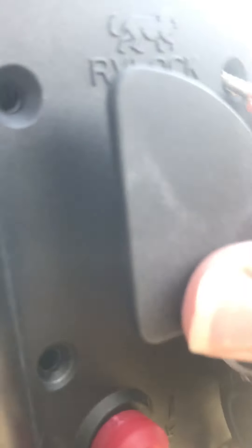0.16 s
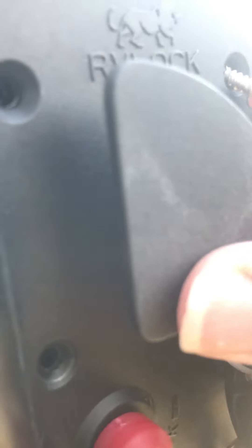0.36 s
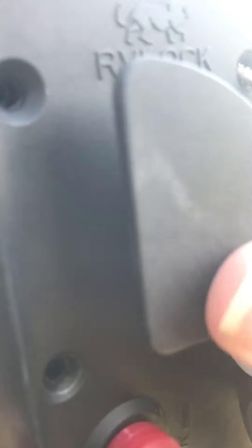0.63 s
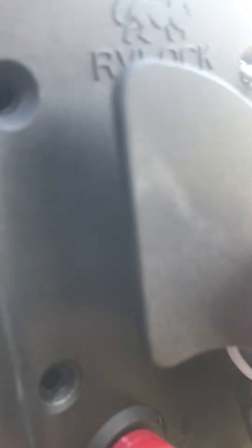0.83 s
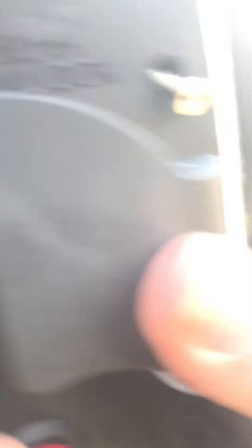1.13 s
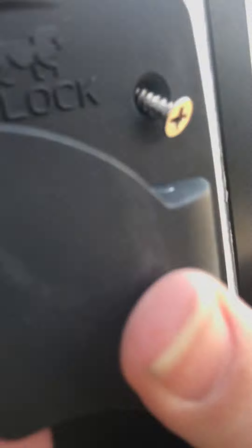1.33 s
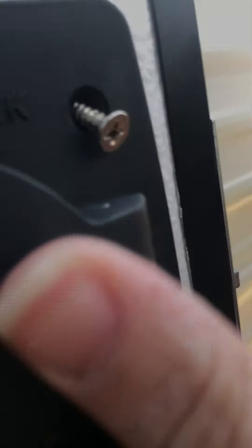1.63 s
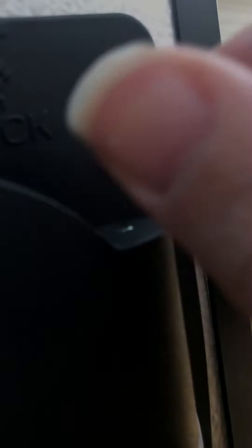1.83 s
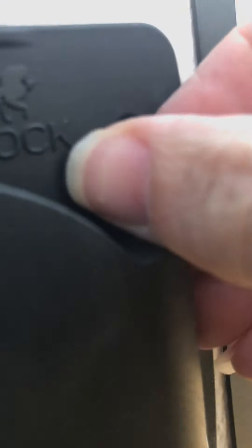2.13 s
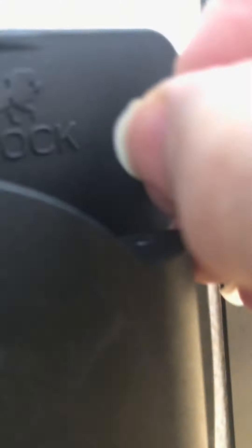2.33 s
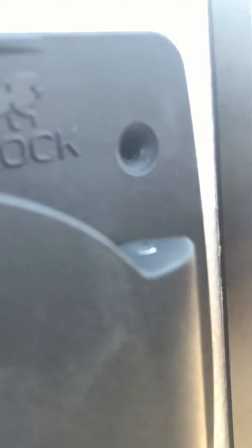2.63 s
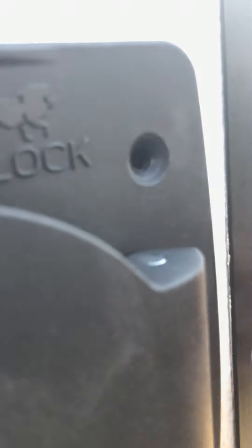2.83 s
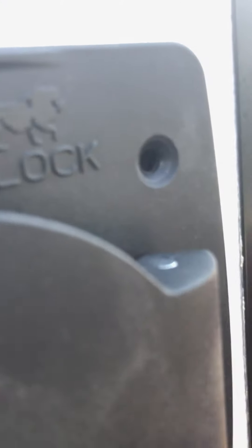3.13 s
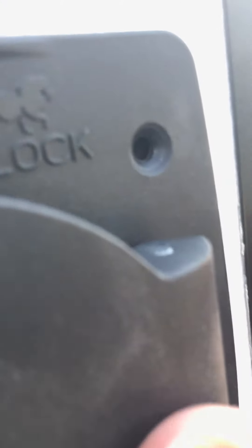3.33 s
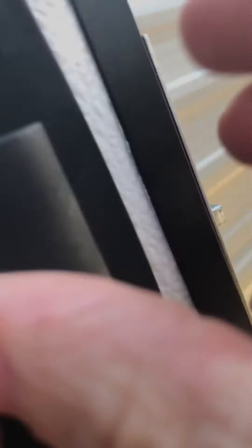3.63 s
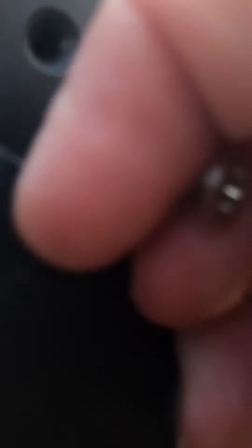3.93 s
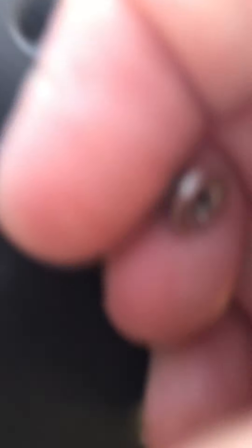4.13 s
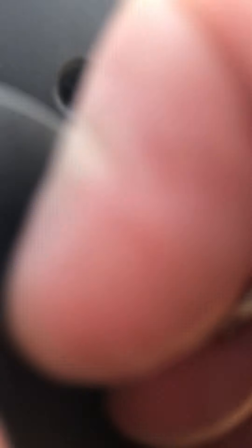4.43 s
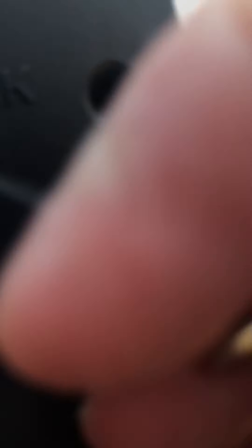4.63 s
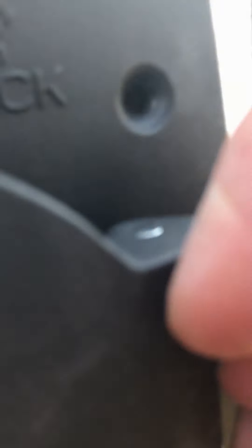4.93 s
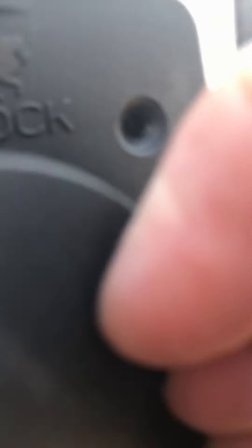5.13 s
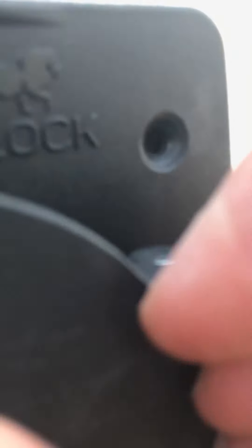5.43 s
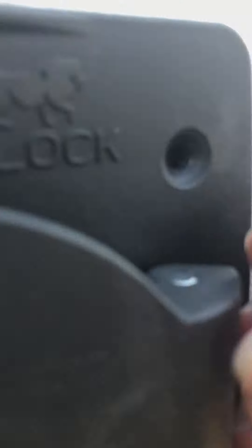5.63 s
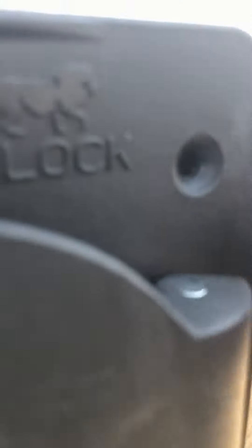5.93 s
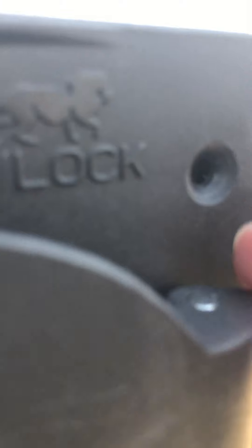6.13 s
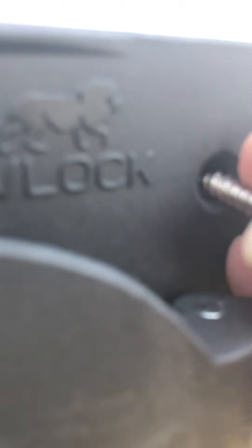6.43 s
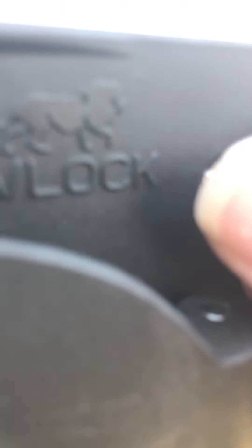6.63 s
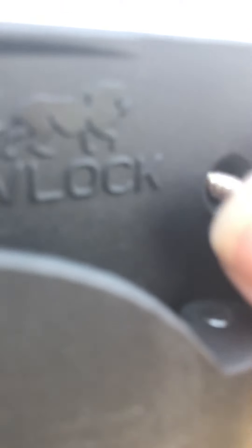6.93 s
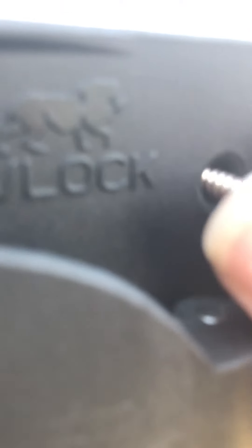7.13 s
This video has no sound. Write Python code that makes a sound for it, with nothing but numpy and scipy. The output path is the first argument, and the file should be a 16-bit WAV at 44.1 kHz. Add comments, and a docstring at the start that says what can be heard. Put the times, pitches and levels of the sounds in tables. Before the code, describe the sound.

A phone close to a hollow door lock in a still, quiet room with faint low air and hand rumble. From 0 to 1 s, faint spring ticks, light clicks at 0.2 and 0.4, a small double tap near 0.8, and dry thumb rustle. Soft brushing and tiny taps continue to 2.2, when a crisp metallic snap with a tiny squeal and several clicks breaks out until 2.35, followed by a faint finger squeak. Sparse soft taps follow around 3.1 to 3.4. Finger scuffs swell from 3.7; from 3.95 the loose latch rattles and clicks. From 4.4 to 5.7 comes the busiest, loudest stretch: hard plastic clacks, short metal scrapes, and dull door thumps, strongest near 4.65 and 5.35, with small bright key clinks around 4.9 to 5.6. Then near silence; at 6.3 to 6.6 gritty screw scraping and light clacks, and one last faint slide at 7.2.

```python
"""Hands on a door lock

Handle and latch clack in their housing, parts slide and squeal, a screw grates in its hole, a key clinks.
Contacts are noise bursts through the housing modes; they echo in the hollow door and stir its panel.
Fingers stroke the casing as coloured stick-slip noise, the loose latch rattles, harder blows shake the door.
Close by a phone, which rounds peaks and cuts the top; a quiet room lies behind."""
import sys
import numpy as np
from scipy import signal
from scipy.fft import rfft, irfft, next_fast_len
from scipy.io import wavfile
from scipy.ndimage import uniform_filter1d, map_coordinates

SR = 44100
rng = np.random.default_rng(int(sys.argv[2]) if len(sys.argv) > 2 else 0)


def waveform_to_disk(signal):
    """Save audio, clipped to [-1, 1], as 16-bit WAV at the path in sys.argv[1]."""
    frames = np.transpose(np.atleast_2d(signal))
    scaled = np.clip(frames, -1, 1) * 32767
    samples = np.round(scaled).astype(np.int16)
    wavfile.write(sys.argv[1], SR, samples)


N = 320607

# sharp contacts of the lock parts: start_s, knock_pitch_hz, knock_db, clack_db, tick_db
CONTACTS = [(0.2059, 1640, -41, -43, -35), (0.2104, 1150, -31, -40, -38), (0.245, 1250, -42, -44.5, -51),
            (.3795, 1600, -43.5, -48, -53), (0.4094, 1270, -47, -41, -44), (0.4335, 1690, -29, -28.5, -48),
            (0.7903, 954, -33, -37.5, -57), (.8007, 970, -32, -32.5, -62), (0.814, 1600, -42, -40, -61),
            (1.06, 1380, -40.5, -43, -52), (1.555, 1200, -51, -56, -58), (1.62, 1570, -38, -51, -63),
            (1.658, 1410, -43.5, -51, -72), (1.9007, 1176, -44, -52, -54), (2.047, 1070, -45, -50.5, -53.5),
            (2.208, 1350, -41, -50, -59), (2.2844, 1190, -29, -30, -34), (2.2931, 976, -34.5, -27.5, -20.5),
            (2.297, 1000, -35.5, -34, -29), (2.3181, 1340, -45.5, -28.5, -29.5),
            (2.331, 1462, -32, -33.5, -52), (2.335, 1400, -28.5, -39, -59),
            (2.3488, 1510, -29.5, -34.5, -52), (3.135, 1230, -43.5, -41, -50.5),
            (3.1652, 1150, -32, -66, -65), (3.2115, 1190, -40, -48, -69.5), (3.3728, 1410, -41, -53, -52),
            (3.9638, 1310, -39, -30, -50), (3.9842, 1590, -32.5, -48, -60), (4.0875, 1750, -22, -29.5, -51),
            (4.2577, 720, -30, -35, -46), (4.309, 1710, -33.5, -40, -45), (4.418, 1304, -31, -44.5, -44.5),
            (4.4474, 1780, -17.5, -26.5, -45), (4.462, 1510, -25.5, -32, -48),
            (4.483, 1700, -35, -44, -65.5), (4.5129, 850, -29, -61, -64), (4.5938, 1204, -27, -47, -67.5),
            (4.633, 1190, -25, -40.5, -42), (4.6438, 1170, -11, -15.5, -42), (4.692, 1300, -21.5, -31, -59),
            (4.7043, 1020, -26, -34.5, -56.5), (4.717, 1100, -23.5, -35.5, -57),
            (4.7249, 980, -32.5, -32, -56), (4.742, 870, -28.5, -33.5, -71),
            (4.8077, 1540, -30.5, -34, -48.5), (4.8713, 970, -16.5, -17.5, -43),
            (4.88, 840, -23, -38.5, -35.5), (4.9295, 1600, -22, -25, -39), (5.016, 1070, -20.5, -41, -49),
            (5.021, 930, -18.5, -23.5, -44), (5.0366, 1100, -28, -38, -57), (5.062, 1550, -31, -38.5, -65),
            (5.074, 1500, -33.5, -47.5, -68), (5.169, 1200, -33.5, -43, -49),
            (5.181, 1280, -27, -38.5, -46), (5.1871, 1230, -15.5, -40, -43.5),
            (5.215, 1570, -17.5, -31.5, -43.5), (5.2324, 1470, -20.5, -31, -49),
            (5.2406, 1372, -31.5, -34.5, -49), (5.3033, 1140, -20, -38.5, -47),
            (5.316, 1300, -24, -42, -55.5), (5.3441, 900, -11, -19, -47),
            (5.3687, 1070, -5.5, -27.5, -35.5), (5.43, 896, -22, -37.5, -61), (5.4492, 1070, -30, -24, -38),
            (5.471, 1120, -19, -22.5, -38), (5.4753, 1140, -34, -12.5, -25), (5.495, 1100, -32, -46, -55.5),
            (5.5854, 1410, -25.5, -29, -36), (5.6214, 1790, -18.5, -25, -34),
            (5.666, 1660, -27.5, -34.5, -52), (5.68, 1700, -34, -43, -62), (5.812, 1390, -41, -55, -88),
            (6.292, 1070, -48, -33.5, -47.5), (6.378, 900, -46, -42, -73), (6.4741, 1030, -38, -29.5, -52),
            (6.499, 780, -29, -26.5, -47), (6.506, 760, -36, -31.5, -55), (6.5251, 720, -32, -39, -45.5),
            (6.5579, 970, -38.5, -36, -56)]
# metal sliding on metal: start_s, length_s, knock_pitch_hz, knock_db, clack_db, tick_db
METAL_SLIDES = [(1.614, 0.031, 790, -50, -69, -50), (2.257, 0.013, 1250, -49, -57, -48),
                (2.2768, 0.0025, 1700, -18, -15, -12), (2.2795, 0.0031, 1696, -26.5, -17.5, -10),
                (2.309, 0.01, 1330, -42, -34, -34.5), (3.513, 0.055, 1360, -50, -50, -57),
                (3.938, 0.019, 1330, -34, -32, -50), (4.029, 0.011, 1460, -27.5, -27.5, -27.5),
                (4.098, 0.047, 1420, -28.5, -41, -64), (4.227, 0.021, 1200, -38.5, -35.5, -40.5),
                (4.618, 0.0022, 1210, -24, -43.5, -35), (4.653, 0.01, 1100, -12.5, -18.5, -15.5),
                (4.965, 0.0059, 1470, -23.5, -32.5, -44), (5.125, 0.0058, 1230, -25, -33.5, -37.5),
                (5.3258, 0.0086, 1211, -32, -45, -27.5), (5.3671, 0.0091, 1110, -17, -16, -14.5),
                (5.44, 0.0055, 1000, -27.5, -28, -42), (6.289, 0.0085, 860, -39.5, -38, -59),
                (7.224, 0.043, 1410, -49.5, -49.5, -50.5)]
# squeals of the sliding parts: start_s, length_s, pitch_hz, level_db
SLIDE_SQUEALS = [(2.2754, 0.006, 5540, -14.5), (4.036, 0.0026, 8450, -19.5), (4.395, .011, 6260, -42.5),
                 (4.617, 0.0044, 6570, -28), (4.656, 0.0074, 4054, -16), (4.657, 0.0065, 14500, -14.5),
                 (5.372, 0.0067, 14700, -22)]
# screw pushed against its hole: start_s, length_s, level_db
SCREW_PUSHES = [(6.298, 0.013, -34.5), (6.335, 0.028, -43.5), (6.414, 0.067, -43.5)]
# screw thread colour: frequency_hz, level_db
THREAD_COLOUR = [(400, -7), (750, 4.5), (1750, -12), (3000, 1), (5500, -10), (6500, -25), (15000, -28)]
# span in which the latch hangs loose: start_s, end_s
LATCH_LOOSE_S = 3.93, 5.7
# finger strokes over the casing: start_s, length_s, friction_db (before the trim in fingers), hiss_db
FINGER_STROKES = [(0.197, 0.027, -41, -45), (0.379, 0.045, -42.5, -45.5), (0.703, 0.23, -57, -57),
                  (1.053, 0.04, -48, -55), (1.436, 0.13, -53, -64), (1.63, 0.083, -55, -66),
                  (1.89, 0.18, -52, -68), (2.215, 0.15, -41.5, -57), (3.098, 0.13, -51.5, -63.5),
                  (3.269, 0.21, -50, -66), (3.68, 0.25, -39.5, -52), (3.745, 0.052, -30.5, -41),
                  (3.812, 0.018, -31, -39), (3.936, 0.23, -36.5, -51), (4.215, 0.1, -40, -46.5),
                  (4.304, 0.18, -44, -63), (4.39, 0.023, -32, -45), (4.601, 0.11, -33, -45),
                  (4.84, 0.066, -35.5, -46.5), (4.948, 0.13, -34, -52.5), (5.109, 0.074, -39, -52),
                  (5.313, 0.06, -36.5, -39.5), (5.41, 0.28, -43, -57.5), (6.296, 0.45, -49, -67.5),
                  (7.229, 0.045, -44.5, -56)]
# finger friction colour: frequency_hz, level_db
RUB_COLOUR = [(300, -19.5), (520, 0.5), (760, 4), (1350, -1), (2000, -7.5), (2800, -8), (4100, -12),
              (4800, -27.5), (7000, -48)]
# finger hiss colour: frequency_hz, level_db
HISS_COLOUR = [(3000, -26.5), (4700, -2.5), (6200, 4.5), (7400, -3.5), (8600, -2), (11000, -7),
               (14500, -1.5), (16000, -12.5)]
# housing modes: frequency_hz, level_db, t60_s
HOUSING_MODES = [(890, -3, .04), (1095, -1, .045), (1330, -3, .05), (1515, -5, .04), (1665, -3, .05),
                 (2390, -1, .03), (2800, 1, .02), (4110, 1, .03), (5520, 2, .033), (6240, 1, .033)]
# door panel modes: frequency_hz, level_db, t60_s
PANEL_MODES = [(802, 0, .15), (1690, -13, .07), (3040, -7, .2)]
# pitches the casing weakens: frequency_hz, width_hz
CASING_NOTCHES = [(1970, 140), (4800, 270)]
# key against the plate: start_s, level_db
KEY_CLINKS = [(4.809, -48), (4.878, -31.5), (5.186, -36), (5.4763, -27), (5.504, -21.5), (5.587, -33)]
# key modes: frequency_hz, level_db, t60_s
KEY_MODES = [(6900, 5, 0.026), (7140, -2, 0.038), (9570, 4.5, 0.033), (10600, -14, 0.047),
             (14250, 4.5, 0.017), (15000, -4, .014)]
# loose spring set singing: start_s, level_db
SPRING_TWANGS = [(4.658, -63), (5.187, -63.5), (5.474, -58.5)]
# runs of handle spring ticks: start_s, length_s, level_db
SPRING_CREAKS = [(0.083, .056, -56.5), (0.185, .008, -42), (0.351, .008, -48), (0.47, .04, -56),
                 (0.997, .056, -53.5)]
# blows that reach door and hand: start_s, door_ring_db, rumble_db
DOOR_BLOWS = [(.213, -34, -37), (.765, -38.5, -38), (.796, -35, -53), (2.277, -25, -36.5),
              (3.168, -38, -40), (3.376, -39, -40), (3.728, -39, -44), (4.085, -36.5, -41),
              (4.122, -28.5, -36.5), (4.245, -38, -39), (4.349, -49.5, -33), (4.66, -15.5, -33),
              (5.037, -38.5, -37), (5.19, -33, -32), (5.376, -16.5, -30), (6.525, -43, -38)]
# door modes: frequency_hz, level_db, t60_s
DOOR_MODES = [(54.5, -12, .12), (146, -9.5, 0.21), (234, 1.5, .07), (278.3, 2, 0.1), (347, 3.5, 0.037),
              (409, -1, 0.088), (483, 1.5, .06), (664.5, 4.5, 0.052)]
# light thumb brushes over the plate: start_s, length_s, level_db
THUMB_BRUSHES = [(.04, 0.022, -51.5), (.712, 0.21, -53), (1.07, 0.033, -46), (1.105, 0.41, -56),
                 (1.44, 0.1, -51), (3.64, 0.054, -55)]
# thumb brush colour: frequency_hz, level_db
BRUSH_COLOUR = [(700, -17), (1200, 4.5), (1800, 5), (3600, -4), (4300, -1.5), (6600, -9), (7500, -14.5),
                (15000, -14)]
# holding hand rumble colour: frequency_hz, level_db
GRIP_COLOUR = [(22, -35), (35, -8.5), (50, 3), (120, -1.5), (190, -3), (280, -4.5), (400, -13.5),
               (500, -20.5), (800, -41.5)]
# still room colour: frequency_hz, level_db
AIR_COLOUR = [(18, -33), (30, -11.5), (86, -1), (210, -13), (287, -10), (404, -10), (473, -17), (1130, -20),
              (1960, -31.5), (5000, -40.5), (13000, -52), (16000, -49.5)]

ATTACK_S, SAG_DB_PER_S = 0.034, 13.5  # strokes
STROKE_RELEASE_T60_S, CREAK_GAP_S, CAVITY_T60_S = .13, .0165, .03
AIR_DB, TOP_HZ = -52, 15900


def undb(db):
    """Decibels to gain."""
    return 10 ** (np.asarray(db) / 20)


def unit(x):
    """Scale to rms 1."""
    return x / np.sqrt(np.mean(x ** 2) + 1e-20)


def seconds(length_s):
    """Time axis of a short sound."""
    return np.arange(int(length_s * SR)) / SR


def fade(t, t60_s):
    """Exponential decay, 60 dB in t60_s."""
    return np.exp(-np.log(1000) * t / t60_s)


def blow(x, db, span_s=.005):
    """Give a short sound the energy of a level held for span_s."""
    return x * undb(db) * np.sqrt(span_s * SR / (np.sum(x ** 2) + 1e-20))


def add(out, at_s, x):
    """Mix x into out at a time."""
    i = max(int(at_s * SR), 0)
    out[i:i + len(x)] += x[:max(N - i, 0)]


def band(x, lo_hz, hi_hz, order=2):
    """Causal band-pass."""
    edges_hz = [lo_hz, min(hi_hz, SR / 2 - 1000)]
    return signal.sosfilt(signal.butter(order, edges_hz, "band", fs=SR, output="sos"), x)


def colour(x, points):
    """Shape a long sound by frequency_hz, level_db points; rms 1."""
    hz, db = np.transpose(points)
    size = next_fast_len(N)
    f = np.maximum(np.fft.rfftfreq(size, 1 / SR), 1)
    gain = undb(np.interp(np.log(f), np.log(hz), db))
    return unit(irfft(rfft(x, size) * gain, size)[:N])


def walk(rate_hz):
    """Smooth random wander, rms 1."""
    k = max(int(SR / rate_hz), 2)
    steps = np.repeat(rng.standard_normal(N // k + 1), k)
    return unit(uniform_filter1d(steps, k)[:N])


def ring(modes, t, detune=0):
    """Decaying modes; where the blow lands and how the part is held set each sign and exact pitch."""
    out = 0
    for hz, db, t60_s in modes:
        sign = rng.choice([-1, 1])
        mode_hz = hz * (1 + detune * rng.standard_normal())
        out = out + sign * undb(db) * np.sin(2 * np.pi * mode_hz * t) * fade(t, t60_s)
    return out


def resound(x, response, db):
    """What a resonating body or space gives back; db sets the response energy relative to its drive."""
    return signal.fftconvolve(x, response / np.sqrt(np.sum(response ** 2)))[:len(x)] * undb(db)


def pressure(strokes, release_t60_s, attack_s=ATTACK_S):
    """Envelope of start_s, length_s, level_db strokes: attack, sagging hold, release; powers add."""
    power = np.zeros(N)
    for at_s, length_s, db in strokes:
        t = seconds(length_s + release_t60_s)
        attack = np.minimum(t / attack_s, 1)
        release = fade(np.maximum(t - length_s, 0), release_t60_s)
        add(power, at_s, (attack * undb(db - SAG_DB_PER_S * t) * release) ** 2)
    return np.sqrt(power)


def grain(per_s, smooth, spread_db=3.5):
    """Force of a rubbing contact: separate slips of uneven size over a smooth hiss; rms 1."""
    happens = rng.random(N) < per_s / SR
    size = undb(spread_db * np.minimum(rng.exponential(size=N), 3))
    slips = happens * rng.choice([-1, 1], N) * size
    return unit(unit(slips) + smooth * rng.standard_normal(N))


def shifting(x, depth_db, rate_hz):
    """Each half octave swells and fades on its own, so the colour keeps changing."""
    for hz in 700 * 2 ** np.arange(0, 4.5, .5):
        swell = undb(depth_db * walk(rate_hz)) - 1
        x = x + swell * band(x, hz / 2 ** (1 / 4), hz * 2 ** (1 / 4), order=1)
    return x


def drifting(x, rate_hz=9, lag_s=.002):
    """A shifting grip pulls the casing's resonances up and down: a wandering time shift bends pitch."""
    return map_coordinates(x, [np.arange(N) + lag_s * SR * walk(rate_hz)], mode="mirror")


def cupped(x, lag_s, reflection, sway):
    """The moving hand reflects sound from close by and sweeps a row of peaks through it."""
    i = np.arange(N)
    lag = lag_s * SR * (1 + sway * walk(4))
    return x + reflection * np.interp(i - lag, i, x)


def parts(force, knock_hz, knock_spread=1.22, housing_db=-15):
    """A force rings the housing in three damped ranges: casing knocks, plate clacks, edges tick."""
    force = force + resound(force, ring(HOUSING_MODES, seconds(.08), detune=.013), housing_db)
    knock = band(force, knock_hz / knock_spread, knock_hz * knock_spread, order=1)
    knock = band(knock, 560, 2000, order=3)
    clack = band(band(force, 2450, 3400, order=1), 2050, 4400, order=3)
    tick = band(band(force, 2800, 9000, order=1), 4400, 21000, order=2)
    return knock, clack, tick


def clicks(snap=3.7, chatter_t60_s=0.0092, rise_s=0.00016):
    """Each contact is a snap followed by a few milliseconds of chatter."""
    out, t = np.zeros(N), seconds(.08)
    for at_s, hz, *levels_db in CONTACTS:
        force = rng.standard_normal(len(t)) * fade(t, chatter_t60_s) * (1 - np.exp(-t / rise_s))
        force[0] += snap
        add(out, at_s, sum(blow(x, db) for x, db in zip(parts(force, hz), levels_db)))
    return out


def slides(grit_db=5, release_t60_s=0.04, ridges_per_s=1500):
    """A sliding part catches on many tiny ridges, then comes free."""
    out = np.zeros(N)
    for at_s, length_s, hz, *levels_db in METAL_SLIDES:
        t = seconds(length_s + .06)
        release = fade(np.maximum(t - length_s, 0), min(release_t60_s, 2 * length_s))
        press = np.minimum(t / (0.32 * length_s), 1) * release
        ridges = np.interp(t * ridges_per_s, np.arange(len(t)), rng.standard_normal(len(t)))
        force = rng.standard_normal(len(t)) * press * undb(grit_db * ridges)
        add(out, at_s, sum(blow(x, db, length_s) for x, db in zip(parts(force, hz), levels_db)))
    return out


def squeals(width_hz=260):
    """Friction briefly keeps one narrow resonance singing; random phase drift widens the tone."""
    out = np.zeros(N)
    for at_s, length_s, hz, db in SLIDE_SQUEALS:
        t = seconds(length_s * 1.5)
        wobble = np.cumsum(rng.standard_normal(len(t))) * np.sqrt(2 * np.pi * width_hz / SR)
        tone = np.sin(2 * np.pi * hz * t + wobble) * signal.windows.tukey(len(t), .5)
        add(out, at_s, blow(tone, db, length_s))
    return out


def screw(catch_db=3.5, release_t60_s=0.037, attack_s=0.0031):
    """The screw's thread grates on the rim of its hole in small catches."""
    force = grain(per_s=800, smooth=0.65) * undb(catch_db * walk(170))
    return colour(force, THREAD_COLOUR) * pressure(SCREW_PUSHES, release_t60_s, attack_s)


def rattles(per_s=55, base_db=-6, spread_db=3, knock_hz=1050, scatter_octaves=.4,
            clack_db=-6, tick_db=-21, t60_s=0.006):
    """Parts of the loose latch touch lightly at random, as hard as the fingers stroke."""
    out, t, (start_s, end_s) = np.zeros(N), seconds(.025), LATCH_LOOSE_S
    friction = pressure([row[:3] for row in FINGER_STROKES], STROKE_RELEASE_T60_S)
    for when, size, pitch, hardness in rng.random((int(per_s * (end_s - start_s)), 4)):
        at_s = start_s + when * (end_s - start_s)
        hz = knock_hz * 2 ** (scatter_octaves * (2 * pitch - 1))
        knock, clack, tick = parts(rng.standard_normal(len(t)) * fade(t, t60_s), hz)
        touch = blow(knock, 0) + 2 * hardness * (blow(clack, clack_db) + blow(tick, tick_db))
        touch_db = base_db + spread_db * min(-np.log(1 - size), 3)
        add(out, at_s, touch * friction[int(at_s * SR)] * undb(touch_db))
    return out


def fingers(friction_trim_db=-1, hiss_release_t60_s=0.037, housing_db=-11, flutter_db=2.5, scuff_db=2):
    """Skin sticks and slips on the casing in uneven scuffs and rings it; the moving hand shifts its colour."""
    friction = pressure([row[:3] for row in FINGER_STROKES], STROKE_RELEASE_T60_S)
    hiss = pressure([(at_s, length_s, db) for at_s, length_s, _, db in FINGER_STROKES], hiss_release_t60_s)
    force = grain(per_s=700, smooth=0.7) * undb(flutter_db * walk(110))
    force = force + drifting(resound(force, ring(HOUSING_MODES, seconds(.08)), housing_db))
    force = shifting(force, depth_db=2.5, rate_hz=28)
    force = cupped(force, lag_s=.00125, reflection=.35, sway=0.17)
    scuffs = unit(colour(force, RUB_COLOUR) * undb(scuff_db * walk(45)))
    return scuffs * friction * undb(friction_trim_db) + colour(force, HISS_COLOUR) * hiss


def casing(x, depth_db=-8):
    """Sound from the front and back of the casing partly cancels at two pitches."""
    for hz, width_hz in CASING_NOTCHES:
        x = x + (undb(depth_db) - 1) * band(x, hz - width_hz / 2, hz + width_hz / 2, order=1)
    return x


def key():
    """The key swings against the plate and rings briefly, damped by its ring."""
    out, t = np.zeros(N), seconds(.1)
    for at_s, db in KEY_CLINKS:
        add(out, at_s, blow(ring(KEY_MODES, t), db))
    return out


def spring(hz=3106, t60_s=2.1):
    """The latch spring hangs free and sings on faintly after a hard clack: one decaying sine."""
    out, t = np.zeros(N), seconds(t60_s)
    for at_s, db in SPRING_TWANGS:
        add(out, at_s, np.sin(2 * np.pi * hz * t) * fade(t, t60_s) * undb(db))
    return out


def creaks(hz=6000, t60_s=0.0094, snap=1.1, scatter_db=2.5, jitter_s=.002):
    """The handle spring slips on its post at a nearly even pace, ringing a few milliseconds each time."""
    out, t = np.zeros(N), seconds(.02)
    for start_s, length_s, db in SPRING_CREAKS:
        for at_s in np.arange(start_s, start_s + length_s, CREAK_GAP_S):
            edge = band(rng.standard_normal(len(t)), 2100, 14500) * fade(t, 0.0077)
            tick = snap * edge + np.sin(2 * np.pi * hz * t) * fade(t, t60_s)
            tick_db = db + scatter_db * rng.standard_normal()
            add(out, at_s + jitter_s * rng.standard_normal(), blow(tick, tick_db))
    return out


def door(soft_db=-38, soft_hz=210, db_per_octave=6, rise_s=.006):
    """Blows shake the door, which answers a little slowly; harder blows reach higher modes."""
    out, t = np.zeros(N), seconds(0.18)
    for at_s, db, _ in DOOR_BLOWS:
        reach_hz = soft_hz * 2 ** ((db - soft_db) / db_per_octave)
        modes = [(hz, mode_db - 20 * np.log10(1 + (hz / reach_hz) ** 2), t60_s)
                 for hz, mode_db, t60_s in DOOR_MODES]
        shake = ring(modes, t, detune=0.025) * (1 - np.exp(-t / rise_s))
        add(out, at_s, blow(shake, db, span_s=0.016))
    return out


def brushing(release_t60_s=0.11, swell_db=2):
    """Dry skin gliding over the textured plate gives a grainy rustle that swells unevenly."""
    force = shifting(grain(per_s=1400, smooth=0.78), depth_db=1.0, rate_hz=27)
    force = force * undb(swell_db * walk(20))
    rustle = colour(cupped(force, lag_s=0.001164, reflection=.3, sway=0.074), BRUSH_COLOUR)
    return rustle * pressure(THUMB_BRUSHES, release_t60_s)


def fidgets(per_s=8, mid_db=-62, spread_db=4):
    """Fingernails and the loose screw touch the plate faintly at random times."""
    out, t = np.zeros(N), seconds(.02)
    for when, size in rng.random((int(per_s * N / SR), 2)):
        touch = band(rng.standard_normal(len(t)), 1500, 3900) * fade(t, .012)
        add(out, when * N / SR, blow(touch, mid_db + spread_db * (2 * size - 1)))
    return out


def squeak(at_s=2.405, length_s=0.051, base_hz=1235, db=-52, jitter=.16, arch=.012):
    """A fingertip sticks and slips quickly as it leaves the plate; pitch rises and sinks with its speed."""
    out, t = np.zeros(N), seconds(length_s)
    speed = np.sin(np.pi * (t / length_s) ** 2.0)
    hz = base_hz * (1 + arch * speed + jitter * rng.standard_normal(len(t)))
    phase = 2 * np.pi * np.cumsum(hz) / SR
    tone = sum(np.sin(k * phase) / k ** 0.93 for k in range(1, 6))
    add(out, at_s, blow(tone * speed, db, length_s))
    return out


def grip(hold_db=-54, stroke_db=-8, stroke_t60_s=0.206, lead_t60_s=0.17, settle_t60_s=0.39,
         lag_s=0.003, flutter_db=2):
    """The hand rumbles faintly as it holds, more as it rubs, most as it leans into a blow and settles."""
    t = np.arange(N) / SR
    rubbing = undb(stroke_db) * pressure([row[:3] for row in FINGER_STROKES], stroke_t60_s)
    power = undb(hold_db) ** 2 + rubbing ** 2
    for at_s, _, db in DOOR_BLOWS:
        since_s = t - at_s - lag_s
        t60_s = np.where(since_s < 0, lead_t60_s, settle_t60_s)
        power = power + (undb(db) * fade(np.abs(since_s), t60_s)) ** 2
    return colour(rng.standard_normal(N), GRIP_COLOUR) * np.sqrt(power) * undb(flutter_db * walk(25))


def background(flutter_db=.7):
    """Still room: coloured noise with a slight level wander."""
    return colour(rng.standard_normal(N), AIR_COLOUR) * undb(AIR_DB + flutter_db * walk(18.0))


def scene(cavity_db=-20, panel_db=-24, room_db=-31, room_t60_s=0.42):
    """Contacts echo in the hollow of the door and stir its panel; the room adds a weak tail."""
    t = seconds(0.28)
    contacts = clicks() + slides() + squeals() + screw() + rattles()
    hollow = band(rng.standard_normal(len(t)), 580, 1700, order=2)
    hollow = hollow * fade(t, CAVITY_T60_S) * (1 - np.exp(-t / 0.0062))
    body = resound(contacts, hollow, cavity_db) + resound(contacts, ring(PANEL_MODES, t), panel_db)
    lock = casing(contacts + body + fingers())
    lock = lock + key() + spring() + creaks() + door() + brushing() + fidgets() + squeak()
    room = band(rng.standard_normal(len(t)), 150, 1900, order=2) * fade(t, room_t60_s)
    return (lock + resound(lock, room, room_db) + grip() + background())[None]


def record(dry):
    """The phone rounds the hardest peaks and cuts the top."""
    rounded = dry / (1 + (dry / 1.2) ** 4) ** (1 / 4)
    return signal.sosfilt(signal.ellip(8, .2, 70, TOP_HZ, fs=SR, output="sos"), rounded)


dry = scene()
out = record(dry)
waveform_to_disk(out)
```